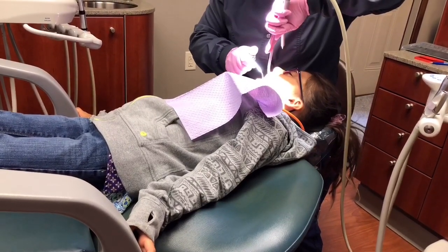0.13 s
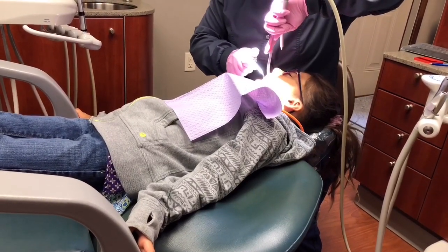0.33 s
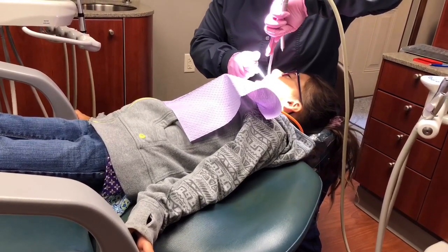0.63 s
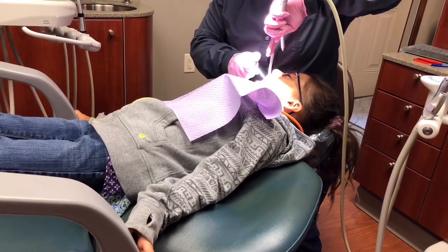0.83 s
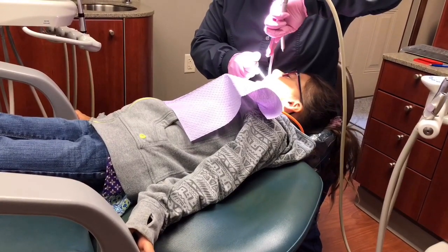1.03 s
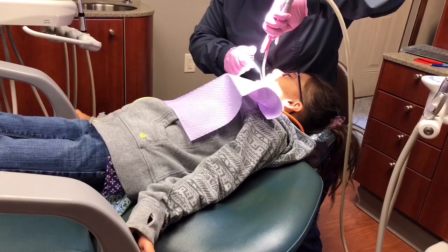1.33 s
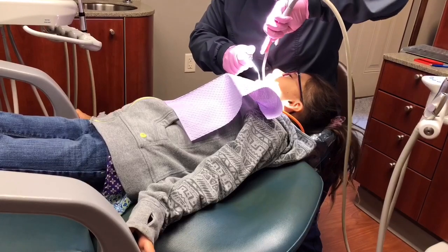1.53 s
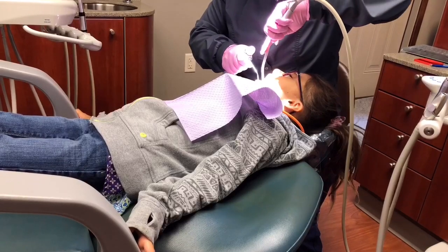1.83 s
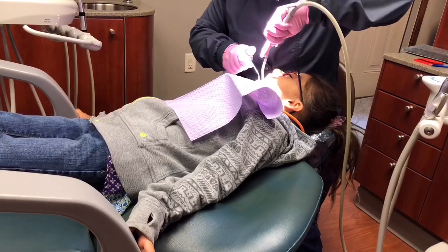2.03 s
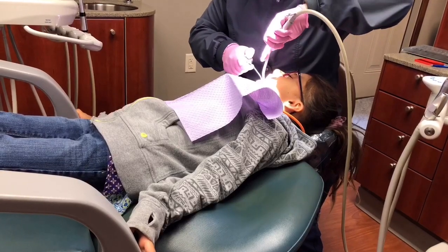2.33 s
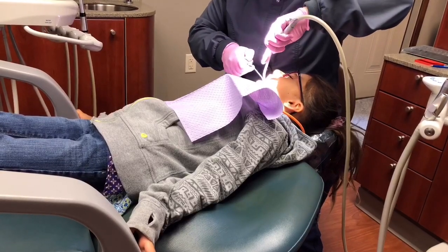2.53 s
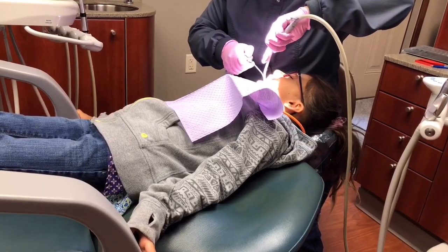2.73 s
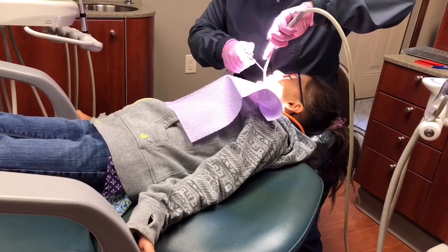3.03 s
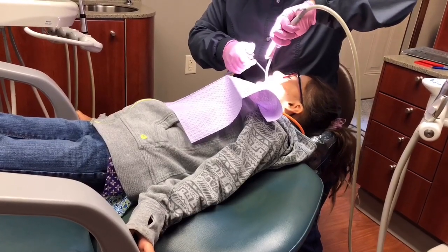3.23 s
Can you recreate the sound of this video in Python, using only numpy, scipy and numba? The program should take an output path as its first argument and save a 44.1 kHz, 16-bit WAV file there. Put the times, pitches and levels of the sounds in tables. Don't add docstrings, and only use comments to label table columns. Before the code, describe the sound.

A dental air jet hisses sharply into an open mouth beside a roaring suction tip

```python
import sys
import numpy as np
from scipy import signal
from scipy.fft import rfft, irfft
from scipy.io import wavfile
from numba import njit

SR = 44100
rng = np.random.default_rng(int(sys.argv[2]) if len(sys.argv) > 2 else 0)


def put_to_file(sound):
    columns = np.atleast_2d(sound).T
    safe = np.clip(columns, -1, 1)
    whole_steps = np.round(safe * 32767)
    wavfile.write(sys.argv[1], SR, whole_steps.astype(np.int16))


def field_ratio(decibels):
    return 10 ** (np.asarray(decibels, dtype=float) / 20)


N = 149499
PAD = 16384

# (frequency [Hz], density [dB per Hz])
MACHINE_SPECTRUM = [(24, -26), (55, -6.5), (110, -7.5), (250, -4), (480, -11.5), (640, -18.5), (1300, -16),
                    (3000, -36)]
# (frequency [Hz], width [Hz], level [dB])
DUCT_MODES = [(112.2, 12, -60.5), (370, 27, -59), (512.2, 18, -64)]
# (time [s], level [dB], openness of the tip [dB])
SUCTION_FLOW = [(0.0, -36.5, 4), (0.28, -33, 2), (0.46, -39, 1.5), (0.66, -33.5, 1.5), (0.91, -35, 0.5),
                (1.17, -30, -5), (1.41, -39.5, 5), (1.52, -36.5, -1), (1.61, -43, 6.5), (2.17, -42, -1),
                (2.2, -34, 4.5), (2.56, -33, 1), (2.75, -60, -31), (2.9, -44, -5), (2.95, -31, -7.5),
                (3.0, -39.5, 3.5), (3.26, -43.5, 2), (3.39, -41.5, 0)]
# (frequency [Hz], width [Hz], level [dB])
SUCTION_MODES = [(1884, 417, 6), (2600, 370, -10), (1600, 500, -4.5)]
# (frequency [Hz], density [dB per Hz])
SUCTION_ROAR = [(330, -15), (600, -7), (900, 1), (1600, -3.5), (2600, -11), (3500, -9), (5000, -1),
                (9000, -19.5)]
# (frequency [Hz], width [Hz], level to the suction [dB])
SUCTION_WHISTLES = [(1920, 12, -21.5), (1693, 30, -23), (2196, 19, -23.5)]
# (time [s], level [dB], tube ring [dB], brightness [dB])
JET_FLOW = [(0, -27.5, -2, 3.5), (.24, -25.5, -1, -3), (.35, -28.5, -3, 3), (.52, -27, -3, 1.5),
            (.93, -25, 0, -0.5), (1.05, -22.5, 1, 2.5), (1.21, -22.5, 0, -1.5), (1.36, -40, 4.5, 3.5),
            (2.08, -37, 0.5, 1.5), (2.31, -25, 2.5, 3), (2.46, -27.5, -0.5, 3.5), (2.575, -22, 4.5, 0.5),
            (2.66, -33, -1.5, -1), (2.82, -37.5, -2.5, 3.5), (2.87, -26, -4, 0), (2.95, -25, 0, 2.5),
            (3.06, -36.5, 0, 2), (3.39, -29.5, -0.5, -7.5)]
# (frequency [Hz], density [dB per Hz])
JET_HISS = [(2300, -2), (3200, -9), (4300, -8), (6000, -5), (7000, 1.5), (9500, 0), (12500, -1.5),
            (16000, -2.5)]
# (frequency [Hz], width [Hz], level to the jet [dB])
NOZZLE_WHISTLES = [(4900, 13, -30), (5010, 30, -23.5), (7500, 20, -55)]
# (time [s], lower mode [Hz], upper mode [Hz], lower level [dB], upper level [dB])
TUBE_RING = [(0, 4700, 5150, 1, -2), (.2, 4740, 5230, -3, -2), (.4, 4780, 5150, 0, -0.5),
             (.6, 4730, 5240, 0.5, -6.5), (.9, 4810, 5160, 1, -3.5), (1.1, 4840, 5300, -1, -0.5),
             (1.3, 4780, 5130, -2, -4.5), (1.55, 4730, 5280, -0.5, -2), (1.71, 4670, 5250, 3.5, -5),
             (1.82, 4900, 5250, 3.5, -2.5), (2.1, 4920, 5050, -2, -2), (2.4, 4940, 5140, 0.5, 0),
             (2.6, 4980, 5170, -5.5, 0), (2.79, 4870, 5150, 1, -8), (2.87, 4900, 5170, -2.5, 4.5),
             (3.06, 4650, 5040, -5, -2), (3.17, 4530, 5150, 3, -2), (3.39, 4600, 5100, -0.5, 2)]
# (time [s], resonance [Hz], level [dB])
MOUTH_CAVITY = [(0, 6660, 3.5), (.16, 6650, 2), (.23, 6950, -11), (.39, 6800, -4), (.42, 6700, 0.5),
                (.59, 6770, -2), (.65, 7600, 2), (.95, 7600, -3.5), (1.22, 7300, -11), (1.33, 6800, -4),
                (1.66, 6870, 2), (1.8, 7200, 0), (2.1, 6950, 2), (2.35, 7800, -3.5), (2.76, 6920, -1),
                (2.87, 8430, 3), (3.1, 8060, -2.5), (3.39, 8300, -1.5)]
# (start [s], end [s], resonance [Hz], level to the jet [dB])
TOOTH_POCKETS = [(.0, .75, 9930, -15), (.5, 0.63, 13450, -10), (0.8, 1.21, 10800, -13),
                 (1.0, 1.1, 14300, -12), (1.4, 2.2, 8680, -12), (1.57, 2.02, 12280, -12),
                 (2.0, 2.42, 12500, -12), (1.9, 2.2, 7750, -9.5), (2.5, 2.627, 9480, -10.5),
                 (3, 2.6, 13400, -13), (2.85, 2.97, 9550, -13.5), (3.16, 3.42, 14250, -10),
                 (1.5, 2.15, 14700, -14), (0.42, 0.61, 8000, -11), (3.34, 3.42, 6650, -8),
                 (3.5, 2.8, 13300, -13), (2.64, 2.4, 10800, -14), (1.2, 1.75, 7040, -10),
                 (3.2, 3.33, 5900, -13), (3.25, 3.42, 15400, -15), (3.25, 3.42, 13000, -16),
                 (1.05, 1.24, 11800, -14), (1.5, 1.08, 3300, -18.5)]
# (start [s], end [s], resonance [Hz], level to the jet [dB])
MOUTH_HOLLOWS = [
    (.41, .63, 7300, -7.5),
    (.63, 1.0, 7150, -13),
    (1.85, 2.2, 7500, -7.5),
    (2.22, 2.43, 8100, -5.5),
    (2.5, 2.68, 8600, -7),
    (2.85, 2.97, 8670, -3.5),
    (3.03, 3.14, 8500, -6),
    (3.2, 3.42, 8400, -10.5),
]
# (time [s], half length [s], change of the jet [dB])
WATER_SPITS = [(2.57, 0.0056, 2.5), (2.625, .02, -2.5), (2.67, .015, 2), (2.717, 0.017, -2.5),
               (2.74, 0.0043, 4.5), (2.752, 0.0055, -4), (2.772, .007, 4), (2.84, 0.012, 0),
               (2.862, 0.0097, 2.5), (2.975, 0.026, -2.5), (3.133, 0.025, -2), (1.276, 0.027, 1.5),
               (.36, .045, -1), (2.46, .04, -1.5)]
# (start [s], end [s], centre [Hz], share cancelled [0-1])
CHEEK_SHADOWS = [(1.34, 2.17, 6100, .3), (2.52, 2.66, 6100, 0.7), (2.79, 2.915, 6400, .75),
                 (3.3, 3.1, 6800, 0.54), (3.0, 3.34, 7500, 0.34), (1.35, 1.7, 7600, .4),
                 (2.68, 2.86, 3900, .5), (3.0, 2.9, 3900, .4), (.3, 0.63, 6500, 0.13),
                 (2.62, 2.86, 15300, .6), (2.7, 3, 11800, .5), (1.55, 1.95, 15000, .5),
                 (1.4, 1.64, 11300, 0.4), (1.6, 2.0, 9400, .5), (1.6, 2.0, 11200, 0.5), (1.6, 2, 13600, .4),
                 (3.2, 3.3, 12000, .3), (2.43, 2.5, 14800, .4), (.85, 1.25, 8900, 0.38)]
# (time [s], low edge [Hz], high edge [Hz], level [dB])
SIDE_NOISE = [
    (.175, 9200, 10500, -39),
    (.175, 12900, 15700, -42),
    (.5, 5830, 7660, -36),
    (.5, 12600, 15700, -40),
    (.988, 8300, 9900, -41),
    (1.592, 9500, 11200, -58),
]


def rms_one(x):
    return x / np.sqrt(np.mean(x ** 2) + 1e-20)


def in_time(rows):
    s, *columns = np.transpose(rows)
    return [np.interp(np.arange(N) / SR, s, c) for c in columns]


def drift(rate_hz):
    r = np.exp(-80 * np.pi * rate_hz / SR)
    noise = rng.standard_normal(N // 40 + 2002)
    slow = signal.lfilter([1], [1, -2 * r, r * r], noise)[2000:]
    return np.interp(np.arange(N) / 40, np.arange(len(slow)), rms_one(slow - slow.mean()))


def resonance(x, hz, width_hz):
    r = np.exp(-np.pi * width_hz / SR)
    feedback = [1, -2 * r * np.cos(2 * np.pi * hz / SR), r * r]
    return signal.lfilter([(1 - r * r) / 2, 0, (r * r - 1) / 2], feedback, x)


def rung(modes, slow_db, fast_db):
    out = 0
    for hz, width_hz, db in modes:
        once = resonance(rng.standard_normal(N + PAD), hz, width_hz)
        tone = resonance(once, hz, width_hz)[PAD:]
        out = out + field_ratio(db + slow_db * drift(3.23) + fast_db * drift(23.0)) * rms_one(tone)
    return out


@njit
def moving(x, hz, r, rate):
    y = np.zeros(len(x))
    for i in range(2, len(x)):
        turn = 2 * r * np.cos(2 * np.pi * hz[i] / rate)
        y[i] = x[i] - x[i - 2] + turn * y[i - 1] - r * r * y[i - 2]
    return y


def gliding(centre_hz, width_hz):
    r = np.exp(-np.pi * width_hz / SR)
    once = moving(rng.standard_normal(N), centre_hz, r, SR)
    tone = moving(once, centre_hz, r, SR)
    return rms_one(field_ratio(1.25 * drift(5.4) + 1.0 * drift(38.0)) * rms_one(tone))


def patchy(spectrum, slow_db, fast_db):
    points = np.array(spectrum)
    hz = np.maximum(np.fft.rfftfreq(N, 1 / SR), 1)
    colour = field_ratio(np.interp(np.log(hz), np.log(points[:, 0]), points[:, 1], left=-99, right=-99))
    coloured = rfft(rng.standard_normal(N)) * colour
    shared = drift(31.0)
    place = 3 * np.log2(hz / points[0, 0])
    bands = int(3 * np.log2(points[-1, 0] / points[0, 0])) + 2
    out = 0
    for k in range(bands):
        band = irfft(coloured * np.cos(np.pi / 2 * np.clip(place - k, -1, 1)) ** 2, N)
        out = out + band * field_ratio(slow_db * drift(1.0) + fast_db * (shared + drift(17.0)))
    return rms_one(out)


def stay(start, end):
    t = np.arange(N) / SR
    return np.clip(np.minimum(t - start, end - t) / 0.025 + 0.5, 0, 1)


def machinery():
    t = np.arange(N) / SR
    air = field_ratio(-49.5) * patchy(MACHINE_SPECTRUM, slow_db=0.4, fast_db=0.37)
    pump_hz, pump_db = 257.3, -57
    pump_phase = 2 * np.pi * pump_hz * t + 0.64 * drift(2.9)
    pump = field_ratio(pump_db + 1.4 * drift(4.1)) * np.sqrt(2) * np.sin(pump_phase)
    thrum_s, thrum_half_s, thrum_hz, thrum_db = 1.555, 0.085, 111, -48
    thrum_swell = np.exp(-((t - thrum_s) / thrum_half_s) ** 4)
    thrum = field_ratio(thrum_db) * thrum_swell * np.sin(2 * np.pi * thrum_hz * t)
    return air + rung(DUCT_MODES, slow_db=1.5, fast_db=1.6) + pump + thrum


def room(x):
    t60_s, tail_db, wall_cut_hz, from_hz = 0.21, -7, 6000, 1400
    t = np.arange(PAD) / SR
    dull = np.exp(-2 * np.pi * wall_cut_hz / SR)
    tail = signal.lfilter([1], [1, -dull], rng.standard_normal(PAD))
    tail = tail * field_ratio(-60 * t / t60_s) * (t > 0.003)
    tail = signal.sosfilt(signal.butter(1, from_hz, "high", fs=SR, output="sos"), tail)
    tail = field_ratio(tail_db) * tail / np.sqrt(np.sum(tail ** 2))
    led_in = np.concatenate([x[PAD:0:-1], x])
    wet = signal.fftconvolve(led_in, tail)[PAD:PAD + N]
    return (x + wet) / np.sqrt(1 + field_ratio(tail_db) ** 2)


def cheek_shadow(x):
    lost = 0
    for start, end, hz, share in CHEEK_SHADOWS:
        lost = lost + share * stay(start, end) * resonance(x, hz, width_hz=760)
    return x - lost


def suction():
    db, open_db = in_time(SUCTION_FLOW)
    tube = rms_one(rung(SUCTION_MODES, slow_db=0.6, fast_db=1.5))
    roar = field_ratio(-5 + open_db) * patchy(SUCTION_ROAR, slow_db=1.4, fast_db=0.18)
    whistles = rung(SUCTION_WHISTLES, slow_db=3.5, fast_db=2.5)
    return field_ratio(db) * (tube + roar + whistles)


def hollows(rows, width_share):
    out = 0
    for start, end, hz, db in rows:
        out = out + stay(start, end) * rung([(hz, width_share * hz, db)], slow_db=1.0, fast_db=1.0)
    return out


def jet_hiss(jet_db, bright_db):
    hz = np.maximum(np.fft.rfftfreq(N, 1 / SR), 1)
    hiss = field_ratio(-4.5) * patchy(JET_HISS, slow_db=2.0, fast_db=0.56)
    high = irfft(rfft(hiss) / (1 + (9500 / hz) ** 6), N)
    low = irfft(rfft(hiss) / (1 + (hz / 6500) ** 12), N)
    low_db = 0.25 * (jet_db + 29)
    return hiss + (field_ratio(bright_db) - 1) * high + (field_ratio(low_db) - 1) * low


def tube_ring():
    lower_hz, upper_hz, lower_db, upper_db = in_time(TUBE_RING)
    lower = field_ratio(lower_db) * gliding(lower_hz, width_hz=360)
    upper = field_ratio(upper_db) * gliding(upper_hz, width_hz=360)
    return lower + upper


def water_spits():
    t = np.arange(N) / SR
    return sum(db * np.exp(-((t - s) / half_s) ** 2) for s, half_s, db in WATER_SPITS)


def jet():
    db, ring_db, bright_db = in_time(JET_FLOW)
    cavity_hz, cavity_db = in_time(MOUTH_CAVITY)
    cavity = field_ratio(-8.5 + cavity_db) * gliding(cavity_hz, width_hz=600)
    ring = field_ratio(-7.5 + ring_db) * tube_ring()
    voices = jet_hiss(db, bright_db) + ring + cavity
    voices = voices + hollows(TOOTH_POCKETS, width_share=0.065)
    voices = voices + hollows(MOUTH_HOLLOWS, width_share=0.3)
    voices = voices + rung(NOZZLE_WHISTLES, slow_db=8.5, fast_db=1.5)
    return field_ratio(db + water_spits() + 0.12 * drift(9.2)) * voices


def scene():
    mono = room(cheek_shadow(suction() + jet())) + machinery()
    return np.array([mono, mono])


def roll_off(x):
    return signal.sosfilt(signal.butter(12, 17030, fs=SR, output="sos"), x)


def record(dry):
    t, side = np.arange(N) / SR, 0
    for s, low_hz, high_hz, db in SIDE_NOISE:
        band_pass = signal.butter(6, [low_hz, high_hz], "band", fs=SR, output="sos")
        band = signal.sosfilt(band_pass, rng.standard_normal(N))
        swell = np.cos(np.pi / 2 * np.clip((t - s) / 0.023, -1, 1))
        side = side + field_ratio(db) * rms_one(band) * swell
    stereo = dry + side * [[1], [-1]]
    low_cut_hz, top_hz = 52, 15750
    hz = np.fft.rfftfreq(N, 1 / SR)
    passed = (hz < top_hz) * hz ** 3 / np.sqrt(hz ** 6 + low_cut_hz ** 6)
    mix = irfft(rfft(stereo) * passed, N)
    return roll_off(mix)


dry = scene()
out = record(dry)
put_to_file(out)
```